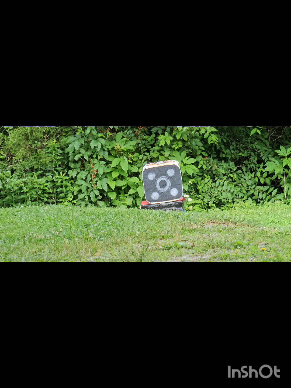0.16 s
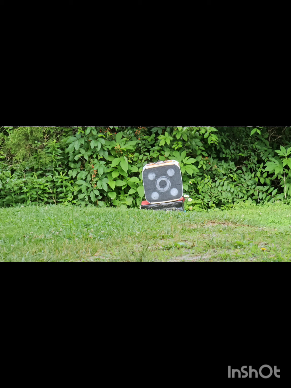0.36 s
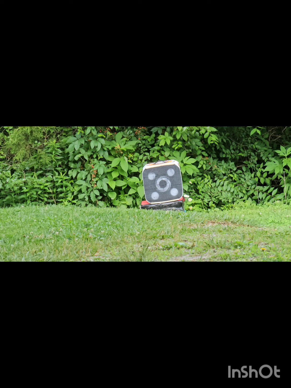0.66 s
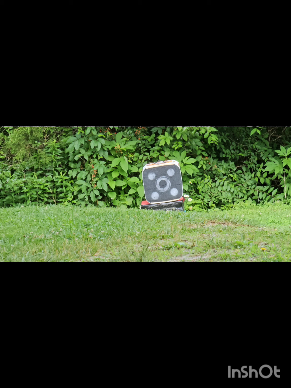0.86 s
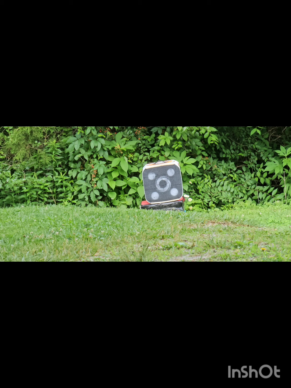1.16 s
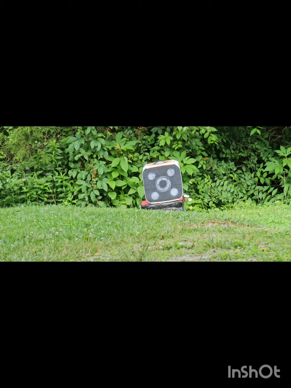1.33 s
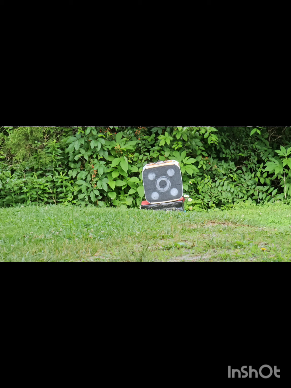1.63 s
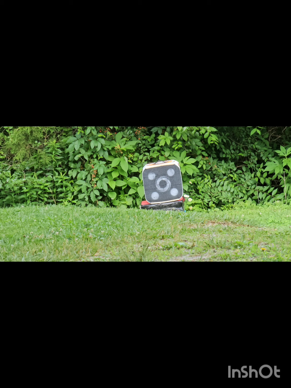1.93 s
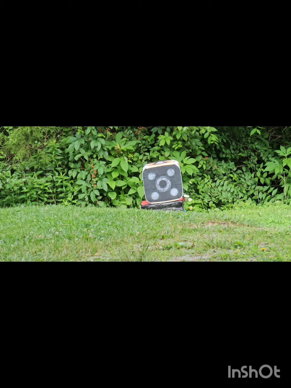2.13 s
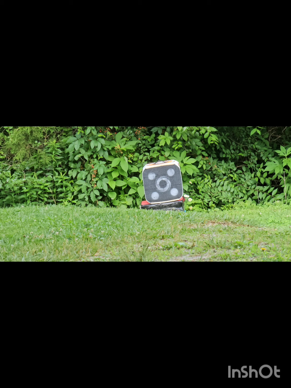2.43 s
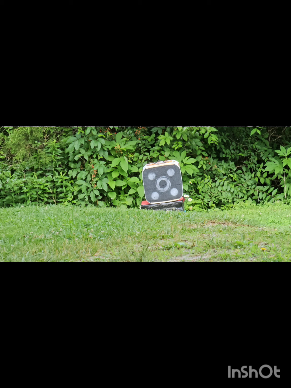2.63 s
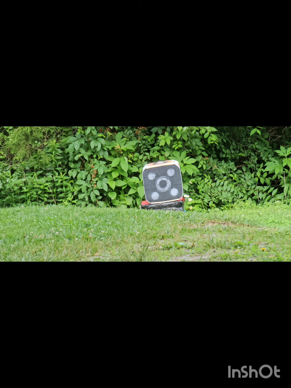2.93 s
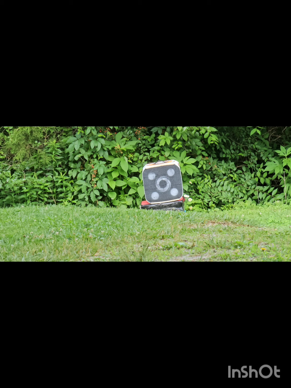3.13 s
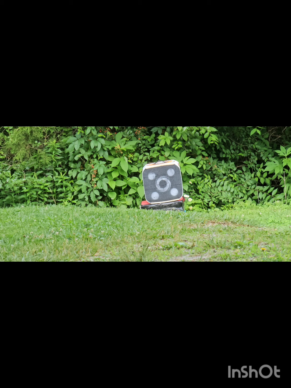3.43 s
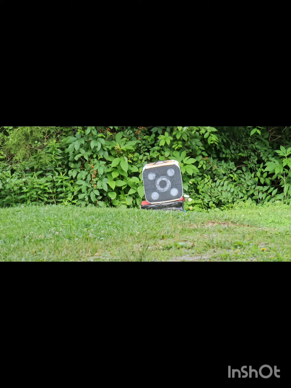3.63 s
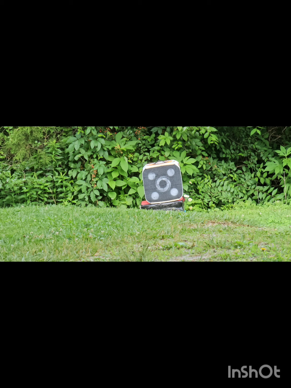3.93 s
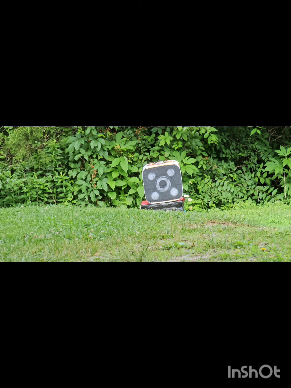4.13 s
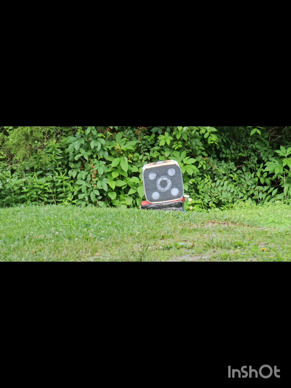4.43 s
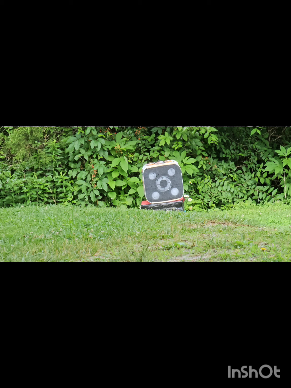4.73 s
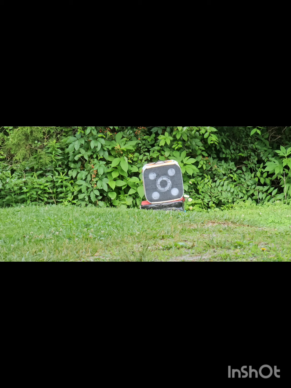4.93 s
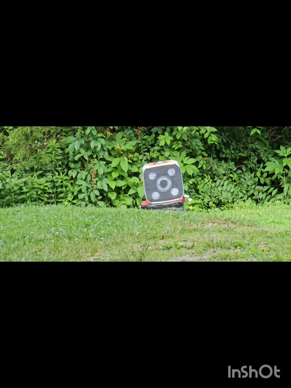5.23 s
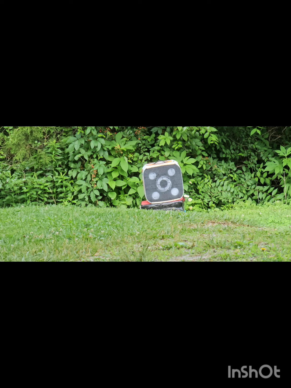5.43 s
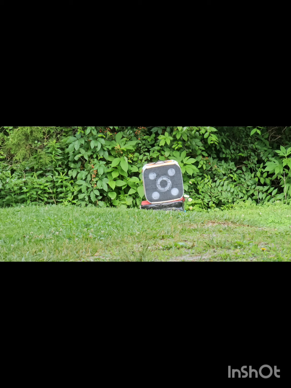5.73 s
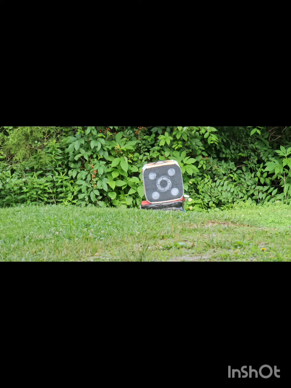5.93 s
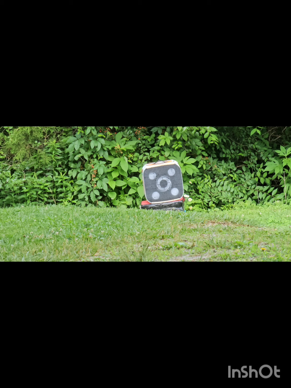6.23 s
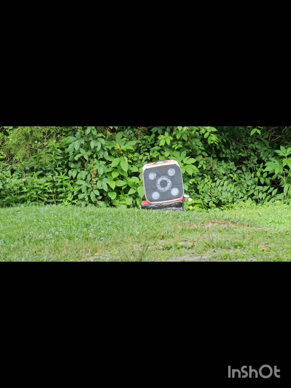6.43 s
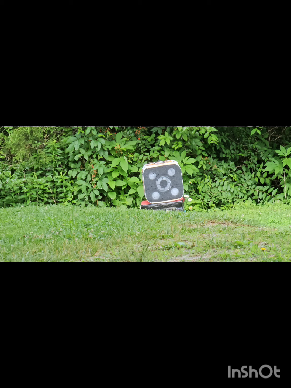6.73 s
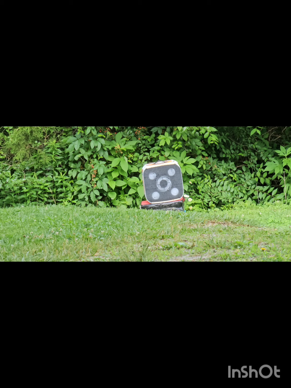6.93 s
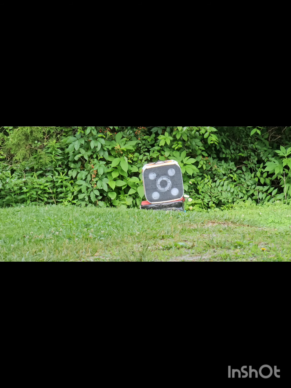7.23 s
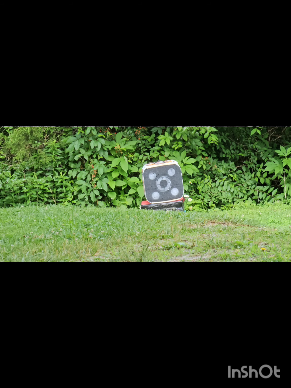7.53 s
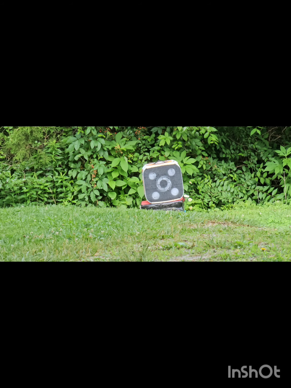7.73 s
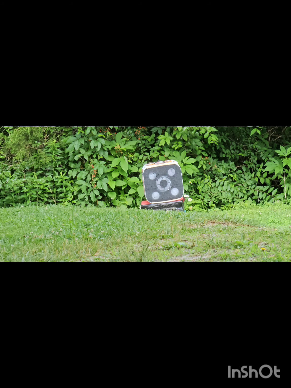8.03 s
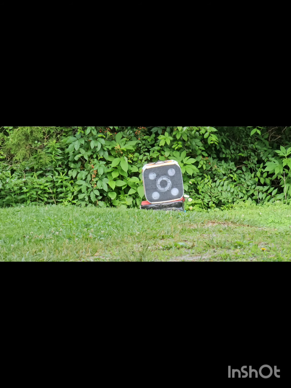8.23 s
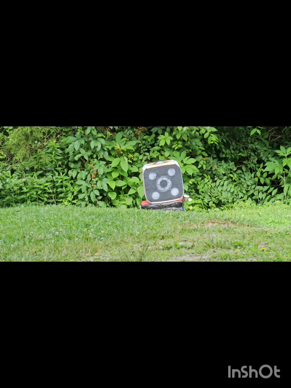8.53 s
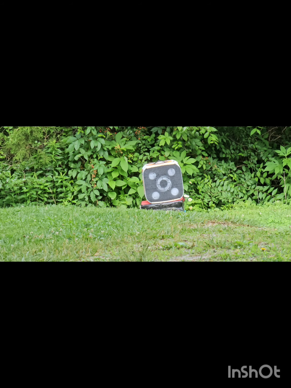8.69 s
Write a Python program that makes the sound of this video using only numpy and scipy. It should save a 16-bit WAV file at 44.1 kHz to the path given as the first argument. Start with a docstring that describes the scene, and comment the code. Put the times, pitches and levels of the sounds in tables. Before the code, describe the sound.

Over a low, soft outdoor rumble, faint songbirds whistle and trill. Midway a crossbow close to the microphone fires: a tiny rail hiss, then a hard rattling snap with limb thump. A third of a second later the bolt smacks a foam block, and the trees echo. Birds continue, cloth stirs faintly, then the bow is laid on a wooden bench with scrapes, knocks and a loud metallic clack.

```python
"""A crossbow shot on a lawn: rail hiss, a rattle of hard noise slaps and ringing limb modes.
A third of a second later the bolt thwacks into a foam block: cracks, a pressure pulse and dull modes.
The yard reverberates and the edge of the wood echoes, both as filtered diffuse noise tails.
At the end the bow is laid on a bench: grainy scrapes, ticks, knocking boards and a metallic ring.
Songbirds, made of gliding sines, call over a low outdoor rumble of coloured noise."""
import sys
import numpy as np
from scipy import signal
from scipy.fft import rfft, irfft, next_fast_len
from scipy.io import wavfile
from scipy.ndimage import uniform_filter1d

SR = 44100
rng = np.random.default_rng(int(sys.argv[2]) if len(sys.argv) > 2 else 0)


def master_out(mix):
    """Clip the mix to full scale and print it as 16-bit PCM to the path in sys.argv[1]."""
    frames = np.transpose(np.atleast_2d(mix))
    ceiling = np.clip(frames, -1, 1)
    pcm = np.round(ceiling * 32767).astype(np.int16)
    wavfile.write(sys.argv[1], SR, pcm)


N = 390726
TIME = np.arange(N) / SR  # s

# resonances of rail, cams and riser: centre_hz, width_hz, level_db over the clatter
METAL_PEAKS = [(3033, 60, 0), (3420, 120, -4), (4080, 45, 0), (4440, 73, 1), (4770, 36, -1.5),
               (5700, 50, -3), (6580, 40, 0), (7370, 100, 0)]
# reverberation of the yard: frequency_hz, t60_s
YARD_T60 = [(150, 0.25), (700, 0.2094), (3000, 0.28), (8000, 0.15), (15000, 0.17)]
# reverberation of the wood: frequency_hz, t60_s
WOOD_T60 = [(150, 0.56), (1000, 0.94), (3500, 0.99), (7000, .72), (15000, .5)]
# strokes that push the bow over the bench: start_s, rise_s, hold_s, shudder_db, scrape_db, grind_db
BENCH_STROKES = [(7.597, .145, .03, -24, -38, -32.5), (7.785, .006, .004, -31, -38, -29),
                 (7.845, .008, .006, -25, -52, -38), (7.97, .035, .24, -31.5, -49, -52),
                 (8.24, .055, .08, -21, -37, -37), (8.628, .015, .01, -43, -60, -58),
                 (8.695, .085, .075, -32, -45, -49)]


def crossbow():
    """The rail hisses up to a rattle of hard slaps; the limbs thump, and the trees throw it all back."""
    # the string drives the bolt along the rail: start_s, rise_s, hold_s, hiss_db
    rail_run = (3.964, .015, .03, -24)
    # thinner colour of the rail hiss: frequency_hz, gain_db
    rail_colour = [(600, -15), (1100, 0), (4000, 1.5), (7000, -1), (12000, -1)]
    # string and limbs slap their stops and rebound: start_s, clack_db, decay_s, limb_thump_db
    slaps = [(3.9881, -16.5, 0.002, -46.5), (3.9931, -11.5, 0.004, -38.5), (3.999, -14, 0.0011, -21.5),
             (4.0037, -9, 0.0021, -16), (4.0079, -10, 0.0053, -26.5), (4.0348, -14.5, 0.0063, -14.5),
             (4.0380, -18, 0.017, -26), (4.0605, -26, 0.01, -20.5), (4.0715, -27, 0.0097, -24)]
    # colour of the clatter: frequency_hz, relative_db
    clack_colour = [(290, -34.5), (500, -6), (761, -10.5), (960, -11), (1400, -5.5), (1510, -14),
                    (1720, -6), (2570, -7.5), (4660, -3), (7530, -6.5), (9090, -13), (14900, -13),
                    (16000, -19.5)]
    # modes of limbs and stock: pitch_hz, relative_db, t60_s
    limb_modes = [(177, -14.5, .22), (256, -2, 0.0489), (350, -5.5, 0.045), (470, -11, 0.083),
                  (520, -15.5, .09), (670, -14, .07), (764, -18, 0.074), (1393, -15, 0.088),
                  (1780, -12.5, 0.025), (2066, -13.5, 0.0741)]
    # likeness of left and right: frequency_hz, coherence (-1 to 1)
    bow_likeness = [(200, 0.67), (640, -0.13), (1400, -0.58), (3100, -0.19), (15000, 0.11)]
    # colour of the echo from the trees: frequency_hz, gain_db
    treeline_colour = [(200, -20.5), (550, -0.5), (850, 4), (1500, 3), (5000, 0), (9000, -5), (16000, -5)]

    start_s, clack_db, decay_s, thump_db = np.transpose(slaps)
    *timing, hiss_db = rail_run
    clatter = noise(clack_colour, bow_likeness, grain_db=2, peaks=METAL_PEAKS)
    rail = tint(clatter, rail_colour) * amp(hiss_db) * swell(*timing, fade=.004)
    clack = rail + clatter * bursts(start_s, clack_db, decay_s, rise=0.00037)
    thump = ring(limb_modes, start_s, thump_db, np.ones(len(start_s)))
    direct = clack + thump

    yard = scatter(amp(-5) * clack + amp(-11) * thump, YARD_T60, rise=.012, delay=.012)
    wood = amp(-20.5) * scatter(direct, WOOD_T60, rise=.05, delay=.03)
    at_trees = tint(direct, treeline_colour)
    short_t60 = [(200, 0.027), (8000, .015)]  # (Hz, s)
    echo = amp(-25.5) * scatter(at_trees, short_t60, rise=.0007, delay=.204)
    # trunks behind the first row of trees
    depths = amp(-25.5) * scatter(at_trees, WOOD_T60, rise=0.0044, delay=.21)
    return direct + yard + wood + echo + depths


def target():
    """The point lands with one sharp pressure pulse; the cover cracks and slaps, then the foam thuds."""
    # the bolt strikes and sinks in, then the block rocks back:
    # start_s, crack_db, decay_s, cover_slap_db, foam_thud_db
    strikes = [(4.3130, -20, 0.0021, -19.5, -39), (4.3185, -36, .004, -17, -26.5),
               (4.3211, -21.5, 0.0039, -28, -28), (4.3294, -34.5, 0.011, -19, -21),
               (4.3587, -43, 0.0088, -28, -50)]
    # colour of the crack: frequency_hz, relative_db
    crack_colour = [(590, -36), (1000, -14), (1220, -5), (1350, -10), (1570, 0), (1790, -14), (1980, -2),
                    (2620, -5), (5900, -5.5), (16000, -25.5)]
    # modes of the taut cover: pitch_hz, relative_db, t60_s
    cover_modes = [(528, -4, 0.039), (630, -3.5, .025), (686, -19.5, 0.076), (870, -10, 0.025),
                   (1170, -19, 0.041)]
    # modes of the foam block: pitch_hz, relative_db, t60_s
    foam_modes = [(70, -10.5, .15), (103, -10, 0.1), (159, -5.5, 0.13), (256.7, -2, .075), (398, -7, 0.05)]

    start_s, crack_db, decay_s, slap_db, thud_db = np.transpose(strikes)
    likeness = [(400, .9), (1500, 0.28), (4000, 0.37), (12000, 0.089)]  # (Hz, coherence)
    crack = noise(crack_colour, likeness, grain_db=1)
    crack = crack * bursts(start_s, crack_db, decay_s, rise=.0001)
    unstretched = np.ones(len(start_s))
    body = ring(cover_modes, start_s, slap_db, unstretched)
    body = body + ring(foam_modes, start_s, thud_db, unstretched)

    u = TIME[:SR // 100] / 0.00019  # time in units of the pulse width
    add(body, start_s[0], -amp(-16.5) * (1 - u) * np.exp(-u))

    yard = scatter(amp(-4.5) * crack + amp(-11.5) * body, YARD_T60, rise=0.0034, delay=0.0058)
    wood = scatter(amp(-14) * crack + amp(-21) * body, WOOD_T60, rise=.015, delay=0.025)
    return crack + body + yard + wood


def setting_down():
    """The bow sticks and slips on the bench: the boards shudder and knock, the stock scrapes and ticks."""
    # the stock catches hard and slips: start_s, bright_tick_db (before a 3 dB lift), scrape_db, decay_s
    slips = [(4.5301, -46, -24, .0008), (7.0145, -38.5, -41, .0055), (7.645, -50, -40, .0042),
             (7.6653, -46, -32.5, .022), (7.721, -22.5, -25, .012), (7.748, -24, -30, .008),
             (7.787, -15.5, -18.5, .005), (7.915, -26.5, -41, .006), (8.0002, -28, -33, .008),
             (8.0357, -42, -52, .02), (8.245, -39, -47, .007), (8.2955, -11, -3.5, .0027),
             (8.302, -38, -22, .04), (8.337, -29, -31, .013), (8.3768, -24, -48, .007),
             (8.386, -22, -48, .004), (8.4356, -43, -39, .02), (8.634, -48, -60, .03),
             (8.668, -45, -58, .012), (8.772, -32, -38, .012)]
    # dull knocks of the bow on the bench: start_s, level_db (before a 2 dB lift), t60_factor
    knock_hits = [(4.5285, -34, .85), (7.0204, -36, 1.7), (7.1519, -25, .45), (7.645, -26.5, .4),
                  (7.756, -16, .36), (7.8475, -12.5, 1.15), (8.067, -18.5, .62), (8.247, -15.5, 1.2),
                  (8.2967, -13.5, 1.9), (8.345, -17, .46), (8.377, -22, 2.3)]
    # modes of the boards: pitch_hz, relative_db, t60_s
    board_modes = [(82.1, -15.5, 0.124), (117, -14, 0.077), (174, -5.5, 0.1), (267, -5, 0.07),
                   (390, -11.5, 0.065), (479, -12, 0.06), (665, -25, .05)]
    # the bow rings on after it lands: pitch_hz, level_db (before a 3 dB cut), t60_s
    bow_modes = [(205, -29, 2.4), (474, -24, .6), (594, -39, 1.3), (1490, -27, 0.55), (1850, -43, 0.49),
                 (3042, -30, .35), (3440, -36, 0.65), (3634, -36, 0.48)]
    # colour of the shudder: frequency_hz, relative_db
    shudder_colour = [(53, -42), (90, -11), (150, -3), (174, 1.5), (205, -4), (240, -4), (267, 2.5),
                      (333, -9.5), (390, 2), (425, -2.5), (479, 1), (557, -10.5), (665, -8.5), (801, -42.5),
                      (1000, -19.5), (1300, -43), (2200, -120)]
    # colour of the scrape: frequency_hz, relative_db
    scrape_colour = [(440, -31), (750, 8), (788, -12), (853, -0.5), (1090, -3.5), (1490, 8.5), (1720, -2),
                     (1870, 6.5), (2190, -5.5), (3000, 0), (3410, -7), (4420, -4), (5890, -14), (6830, -24),
                     (8000, -22), (10400, -67), (17600, -120)]
    # colour of the hollow grind: frequency_hz, relative_db
    hollow_colour = [(400, -35), (750, -5.5), (1000, -4), (1400, 2), (2000, 0), (2700, -12), (4500, -35)]
    # colour of hiss, cloth and ticks: frequency_hz, relative_db
    friction_colour = [(300, -20), (1200, -4), (2400, 2), (3600, -3), (5200, 3.5), (9000, -10), (11500, -1),
                       (13500, -5.5), (16000, -5.5)]
    # likeness of left and right: frequency_hz, coherence (-1 to 1)
    bench_likeness = [(60, 1), (290, 0.98), (640, 0.92), (1410, 0.93), (3100, 0.3), (6820, 0.15),
                      (15000, 0.05)]
    landing_s, stilled_s = 8.2952, 8.64  # the bow lands, then a hand damps it

    pushing, scraping, grinding = sum(
        amp(levels_db)[:, None] * swell(start_s, rise_s, hold_s, fade=.055)
        for start_s, rise_s, hold_s, *levels_db in BENCH_STROKES)
    slip_s, tick_db, scrape_db, decay_s = np.transpose(slips)
    shudder = noise(shudder_colour, bench_likeness, grain_db=4) * pushing
    scrape = noise(scrape_colour, bench_likeness, grain_db=3.5, peaks=METAL_PEAKS)
    scrape = scrape * (scraping + bursts(slip_s, scrape_db, decay_s, rise=0.00051))
    grind = noise(hollow_colour, bench_likeness, grain_db=4.5) * grinding

    snag_s, snag_db = catches(pushing)
    slip_ticks = amp(3) * bursts(slip_s, tick_db, decay_s, rise=0.0038)
    snag_ticks = bursts(snag_s, snag_db - 15, np.full(len(snag_s), .008), rise=.002)
    hiss_level = amp(-13) * scraping + sleeves() + slip_ticks + snag_ticks
    hiss = hiss_level * noise(friction_colour, bench_likeness, grain_db=2)

    boards = ring(board_modes, *np.transpose(knock_hits), contact=.0012)
    boards = boards + ring(board_modes, snag_s, snag_db + 1, np.full(len(snag_s), .6), contact=.0012)
    knocks = amp(2) * tint(boards, [(550, 0), (1100, -12), (3000, -24)])  # wood dulls them

    damping = np.exp(-np.maximum(TIME - stilled_s, 0) / 0.025)
    bow_ring = damping * ring(bow_modes, [landing_s], [-3], [1])
    # the bench lies to the right: its sound reaches the left later
    direct = lagging(shudder + scrape + grind + knocks + hiss + bow_ring, .00032)
    yard = amp(-12) * scatter(direct, YARD_T60, rise=.003, delay=.003)
    wood = amp(-25) * scatter(direct, WOOD_T60, rise=0.015, delay=.02)
    return direct + yard + wood


def catches(push):
    """Chance moments at which the moving bow snags, stronger with the push: times in s and levels in dB."""
    per_s = 20
    times = np.arange(BENCH_STROKES[0][0], TIME[-1], 1 / per_s)
    times = np.minimum(times + rng.random(len(times)) / per_s, TIME[-1])
    push_db = 20 * np.log10(np.interp(times, TIME, push) + 1e-9)
    return times, np.minimum(push_db, -31)  # a harder push breaks free without a stronger catch


def sleeves():
    """Level of the cloth as the bow is lowered: a few swishes over a faint stir."""
    # swishes of the sleeves: start_s, hold_s, fade_s, level_db
    swish_moves = [(6.158, .004, .035, -60.5), (6.752, .008, .025, -57), (6.86, .075, .02, -53.5),
                   (7.0, .17, .09, -58.5), (7.438, .09, .04, -65.5)]
    # faint steady stir of cloth: start_s, rise_s, hold_s, level_db
    cloth_stir = (6.15, .1, 1.0, -75)
    *timing, stir_db = cloth_stir
    swishes = sum(amp(level_db) * swell(start_s, .03, hold_s, fade_s)
                  for start_s, hold_s, fade_s, level_db in swish_moves)
    return swishes + amp(stir_db) * swell(*timing, fade=.1)


def birds():
    """Gliding, wavering whistles and fast uneven trills; the trillers sit deeper in the leaves."""
    # rolling whistled phrase: offset_s, length_s, start_hz, middle_hz, end_hz, relative_db
    phrase_notes = [(0, .048, 2200, 2420, 2620, -55.5), (.044, .048, 2710, 3000, 3030, -54.5),
                    (.11, .042, 3570, 3390, 3430, -54), (.187, .049, 2880, 2620, 2600, -55),
                    (.27, .045, 2940, 2550, 2350, -64), (.311, .04, 2390, 1920, 1620, -58.5)]
    # repeats of the phrase: start_s, gain_db
    phrase_starts = [(4.525, -2.5), (4.932, 0), (5.339, 0)]
    # a second bird's buzzy song: offset_s, length_s, start_hz, middle_hz, end_hz, relative_db, buzz_depth_hz
    song_notes = [(0, .097, 2147, 2600, 3030, -53, 160), (.072, .13, 3035, 3110, 3160, -51, 270),
                  (.275, .1, 3820, 3700, 3500, -58.5, 330), (.385, .19, 2055, 2310, 2600, -61.5, 130),
                  (.49, .1, 3500, 3590, 3600, -64, 400), (.609, .064, 5450, 5250, 5350, -54.5, 223),
                  (.61, .055, 4700, 3920, 3960, -53.5, 650), (.81, .285, 4720, 4630, 4570, -69, 300),
                  (.9, .09, 4400, 3790, 3300, -64, 200)]
    # repeats of the song: start_s, gain_db
    song_starts = [(1.606, -.5), (6.43, -1.5)]
    # long, nearly level whistles: start_s, length_s, start_hz, end_hz, relative_db
    long_whistles = [(1.62, .19, 4380, 4330, -66), (1.8, .26, 4420, 4420, -66.5),
                     (2.288, .33, 5590, 5630, -69), (2.568, .22, 3250, 3290, -61),
                     (2.759, .21, 3270, 3195, -58.5)]
    # distant buzzy calls: start_s, length_s, start_hz, end_hz, relative_db
    far_calls = [(.071, .081, 3000, 3990, -69.5), (.779, .11, 2300, 3880, -68),
                 (1.06, .057, 2700, 3700, -72), (3.542, .22, 4600, 4200, -66),
                 (3.714, .23, 4270, 4390, -64)]
    # reverberation around the birds: frequency_hz, t60_s
    canopy_t60 = [(1500, 0.18), (3000, 0.76), (6000, 0.53)]
    breaks_off_s = 5.59  # the last phrase is left unfinished

    near, far = np.zeros(N), np.zeros(N)
    waver, flutter = wander(count=90), wander(count=130)

    def note(start_s, length_s, pitches_hz, level_db, buzz_hz=0):
        """One syllable: a sine that glides through its pitches, with waver and frequency-modulated buzz."""
        t = TIME[:round(length_s * SR)]
        now = round(start_s * SR) + np.arange(len(t))
        places = np.linspace(0, 1, len(pitches_hz))
        glide = np.polyval(np.polyfit(places, pitches_hz, len(pitches_hz) - 1), t / length_s)
        trill_rate_hz = 125 + 50 * flutter[now]
        trill = buzz_hz * np.sin(2 * np.pi * np.cumsum(trill_rate_hz) / SR)
        # long notes are held more steadily
        pitch_hz = glide + trill + (.25 * buzz_hz + 1.4 / length_s) * waver[now]
        tone = np.sin(2 * np.pi * np.cumsum(pitch_hz) / SR)
        return start_s, amp(level_db) * signal.windows.tukey(len(t), .6) * tone

    for start_s, phrase_db in phrase_starts:
        for offset_s, length_s, *pitches_hz, level_db in phrase_notes:
            if start_s + offset_s < breaks_off_s:
                add(near, *note(start_s + offset_s, length_s, pitches_hz, phrase_db + level_db))
    for start_s, song_db in song_starts:
        for offset_s, length_s, *pitches_hz, level_db, buzz_hz in song_notes:
            add(far, *note(start_s + offset_s, length_s, pitches_hz, song_db + level_db, buzz_hz))
    for start_s, length_s, *pitches_hz, level_db in long_whistles:
        add(far, *note(start_s, length_s, pitches_hz, level_db))
    for start_s, length_s, *pitches_hz, level_db in far_calls:
        add(far, *note(start_s, length_s, pitches_hz, level_db, buzz_hz=340))

    leaves = scatter(amp(1.5) * near + amp(2) * far, canopy_t60, rise=.003, delay=.003)
    balance = amp([[.7], [-.7]])  # slightly to the left
    return balance * (amp(1) * near + amp(-2.5) * far + leaves)


def air():
    """Distant rumble and faint leaf hiss: coloured noise whose level swells slowly."""
    # colour of the outdoor bed: frequency_hz, relative_db
    air_colour = [(12, -36), (20, -3.5), (43, -10.5), (81, 0), (120, -5.5), (388, -28.5), (472, -25.5),
                  (976, -34.5), (2140, -33.5), (2600, -34), (3840, -36), (5680, -38.5), (6600, -45),
                  (7400, -46), (8650, -57.5), (10700, -60.5), (11600, -52.5), (12300, -56.5),
                  (16000, -55.5)]
    # likeness of left and right: frequency_hz, coherence (-1 to 1)
    air_likeness = [(30, 0.78), (120, 0.97), (400, 0.66), (800, 0.2), (1400, .15), (3000, 0), (15000, -0.2)]
    rates_hz = np.geomspace(.3, 4, 8)
    drift = evened(sum(np.sin(2 * np.pi * (rate * TIME + rng.random())) for rate in rates_hz))
    bed = lagging(noise(air_colour, air_likeness), .0004)  # it comes from the right
    return amp(-52 + .6 * drift) * bed


def amp(db):
    """Decibels to gain."""
    return 10 ** (np.asarray(db) / 20)


def evened(x):
    """Scales to an rms of one."""
    return x / np.sqrt(np.mean(x ** 2) + 1e-20)


def read(points, hz):
    """Reads a table on a log-frequency axis."""
    f, value = np.transpose(points)
    return np.interp(np.log(hz + 1), np.log(f + 1), value)


def add(mix, start_s, sound):
    """Mixes a sound in at its start time."""
    part = mix[round(start_s * SR):][:len(sound)]
    part += sound[:len(part)]


def tint(x, spectrum):
    """Filters by a spectrum in dB."""
    size = next_fast_len(N)
    gain = amp(read(spectrum, np.fft.rfftfreq(size, 1 / SR)))
    return irfft(rfft(x, size) * gain, size)[..., :N]


def noise(spectrum, likeness, grain_db=0, peaks=()):
    """Coloured stereo noise at unit rms, with resonances; grain gives each 32 samples a chance level."""
    size = next_fast_len(N)
    hz = np.fft.rfftfreq(size, 1 / SR)
    grain_levels = amp(grain_db * np.clip(rng.standard_normal(size // 32 + 1), -2, 2))
    grains = np.repeat(grain_levels, 32)[:size]
    body = 1 + sum(amp(db) / (1 + 2j * (hz - centre) / width) for centre, width, db in peaks)
    a, b = rfft(rng.standard_normal((2, size)) * grains) * amp(read(spectrum, hz)) * body
    same = np.clip(read(likeness, hz), -1, 1)
    mid, side = a * np.sqrt(1 + same), b * np.sqrt(1 - same)
    return evened(irfft(np.array([mid + side, mid - side]), size)[:, :N])


def bursts(times, dbs, decays, rise):
    """Envelope of blows that rise quickly and die away exponentially."""
    out, t = np.zeros(N), TIME[:SR // 3]
    for start_s, db, decay in zip(times, dbs, decays):
        add(out, start_s, amp(db) * np.exp(-t / max(decay, 1e-4)) * (1 - np.exp(-t / rise)))
    return out


def ring(modes, times, dbs, lengths, contact=.0003):
    """Damped modes pushed over a short contact time in s; length stretches their decay."""
    out, t = np.zeros(N), TIME[:SR * 3 // 4]
    for start_s, db, length in zip(times, dbs, lengths):
        swing = sum(amp(mode_db) * np.exp(-np.log(1000) * t / (t60 * length)) * np.sin(2 * np.pi * hz * t)
                    for hz, mode_db, t60 in modes)
        add(out, start_s, -amp(db) * swing * (1 - np.exp(-t / contact)))
    return tint(out, [(15, -26), (35, -15), (70, -2), (110, 0)])  # small bodies radiate little deep bass


def swell(start, rise, hold, fade):
    """Envelope of one movement: it gathers speed, holds and dies away (all in s)."""
    t = TIME - start
    return np.clip(t / rise, 0, 1) ** 2 * np.exp(-np.maximum(t - rise - hold, 0) / fade)


def wander(count):
    """Smooth chance that changes over about count samples."""
    return evened(uniform_filter1d(uniform_filter1d(rng.standard_normal(N), count), count))


def scatter(x, t60s, rise, delay):
    """Diffuse reflections that arrive after a delay, build up and die band by band."""
    hz, t, bands = signal.stft(rng.standard_normal((2, SR)), SR, nperseg=256)
    bands = bands * np.exp(-np.log(1000) * t / read(t60s, hz)[:, None])
    tail = signal.istft(bands, SR, nperseg=256)[1][:, :SR]
    tail = evened(tail * (1 - np.exp(-TIME[:SR] / rise))) / np.sqrt(SR)  # unit energy
    tail = np.pad(tail, ((0, 0), (round(abs(delay) * SR), 0)))
    return signal.fftconvolve(np.atleast_2d(x), tail, axes=1)[:, :N]


def lagging(x, lag_s):
    """Delays the left channel, as for a source to the right."""
    x = x * np.ones((2, 1))
    return np.array([np.pad(x[0], (round(abs(lag_s) * SR), 0))[:N], x[1]])


def scene():
    """Everything on the lawn."""
    return crossbow() + target() + setting_down() + birds() + air()


def record(dry):
    """Clips the peaks at full scale, then cuts the treble above the band edge."""
    edge_hz = 16100
    low_pass = signal.firwin(511, edge_hz, window=("kaiser", 9), fs=SR)
    return signal.oaconvolve(np.clip(dry, -1, 1), low_pass[None], "same")


dry = scene()
out = record(dry)
master_out(out)
```